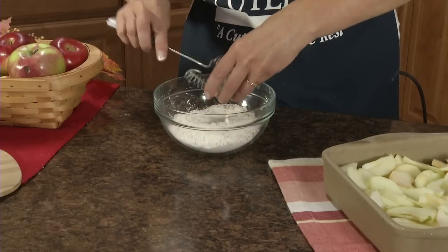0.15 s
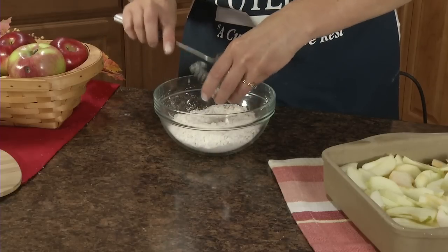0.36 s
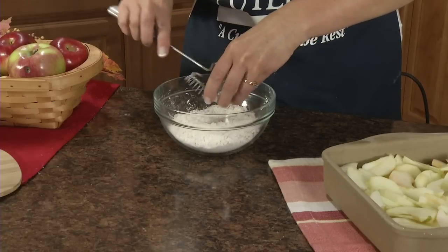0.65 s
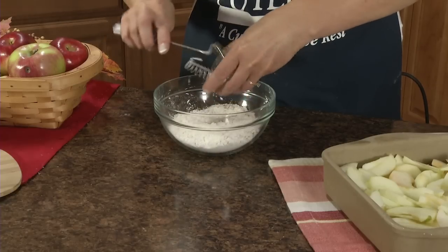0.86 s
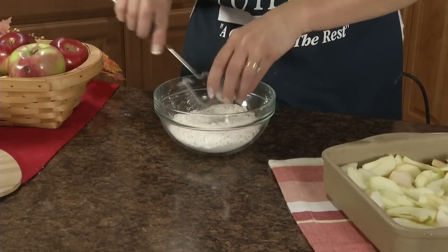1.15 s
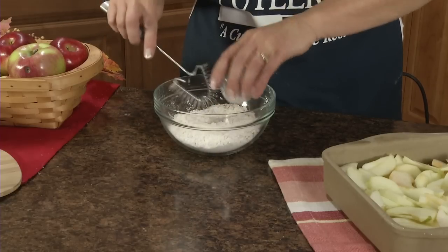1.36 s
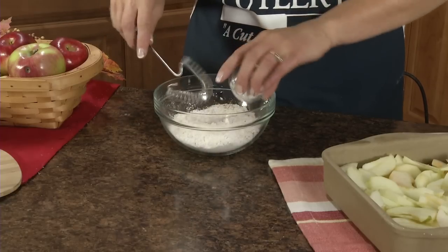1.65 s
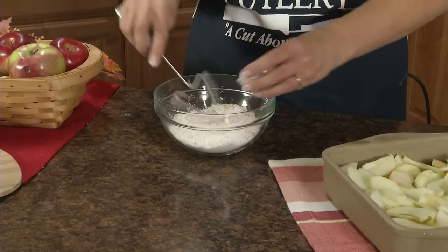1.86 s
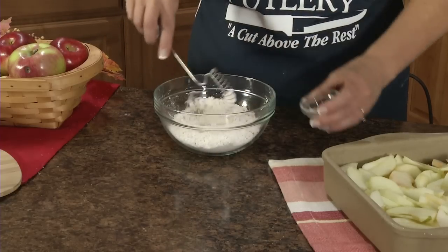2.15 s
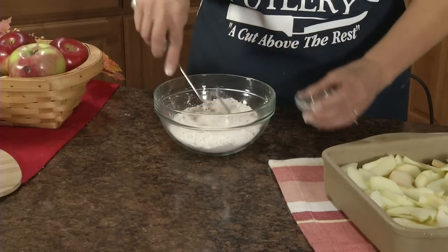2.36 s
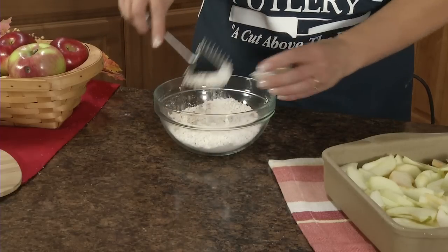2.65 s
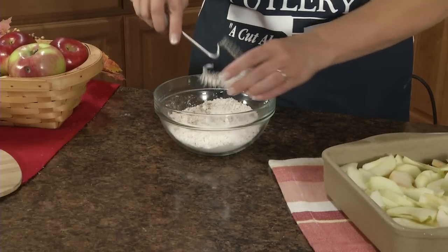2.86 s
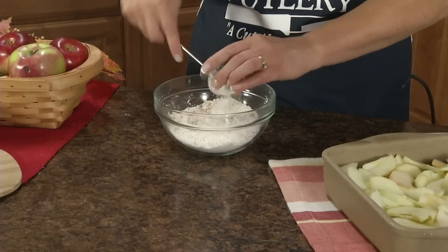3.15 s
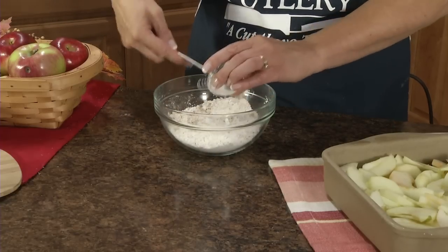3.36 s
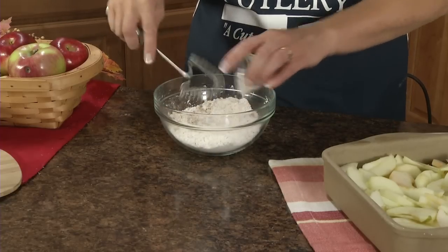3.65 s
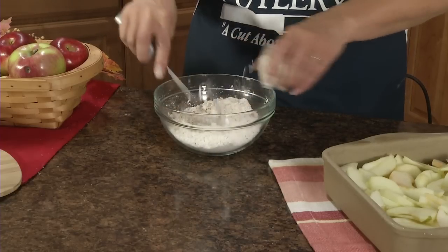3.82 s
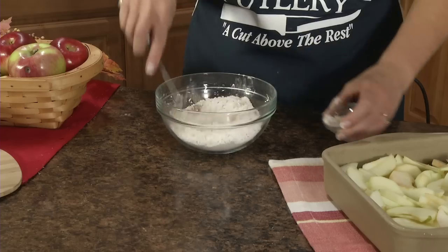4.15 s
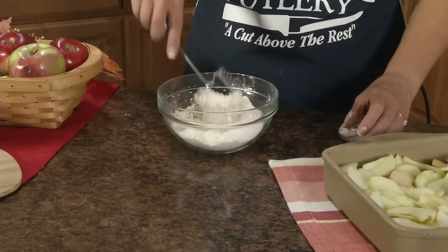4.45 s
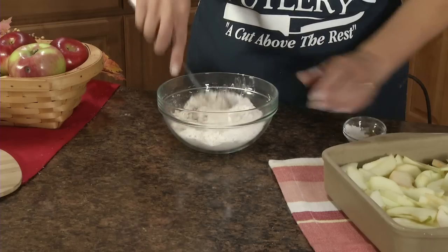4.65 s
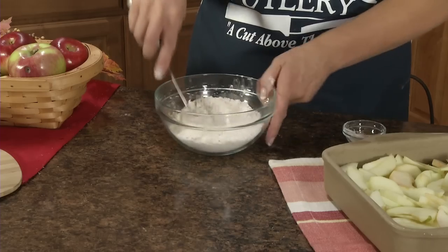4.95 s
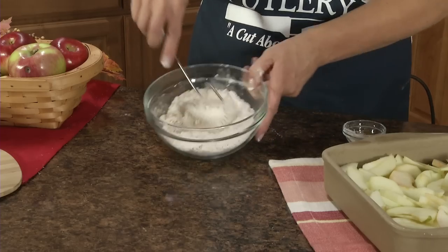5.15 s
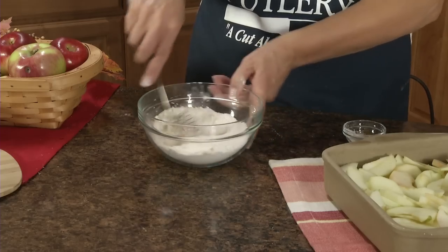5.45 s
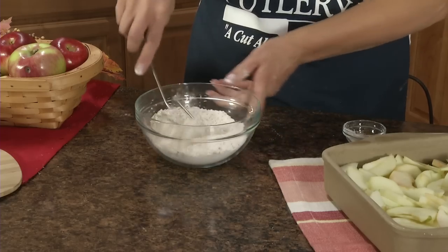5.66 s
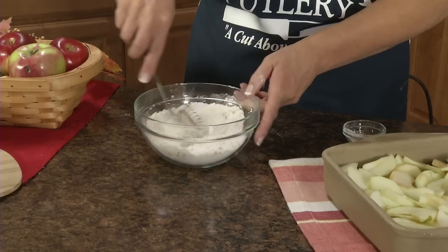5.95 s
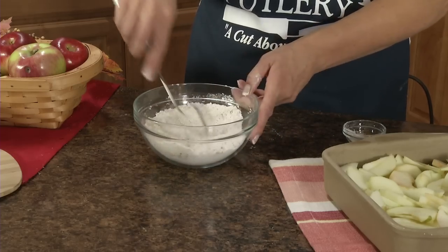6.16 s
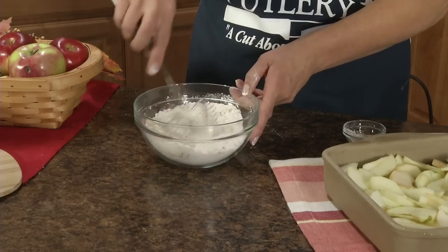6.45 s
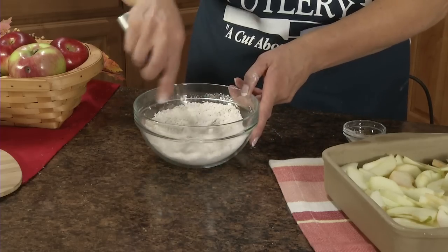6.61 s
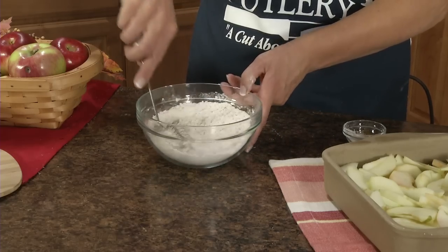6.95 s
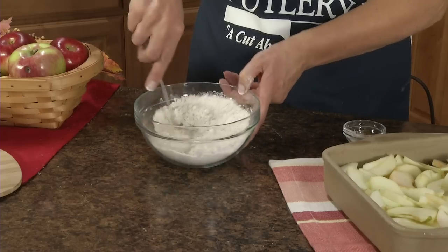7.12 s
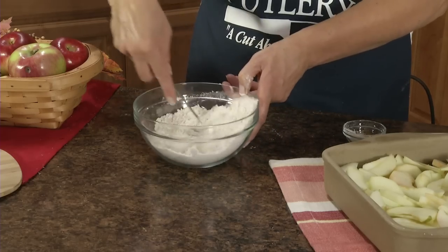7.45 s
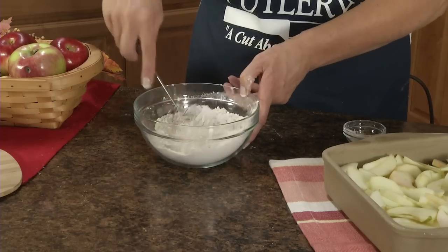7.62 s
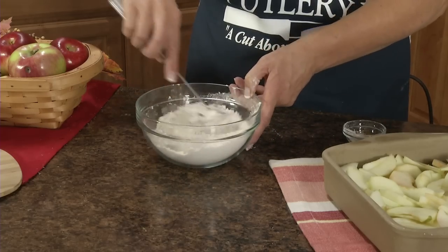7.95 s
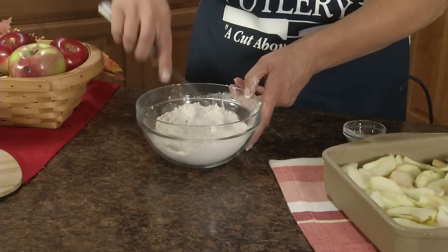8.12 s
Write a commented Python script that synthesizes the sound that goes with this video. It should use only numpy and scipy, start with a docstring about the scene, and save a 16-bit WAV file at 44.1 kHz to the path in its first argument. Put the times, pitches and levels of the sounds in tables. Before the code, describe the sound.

A small glass dish taps against whisk wires, knocks onto a stone counter, then a whisk swishes flour in a glass bowl that thuds twice.

```python
"""A whisk swishes softly through flour in a glass bowl on a stone counter, and pings the bowl's ringing wall.
A small glass dish is tapped against the whisk's wires, then knocks and bounces on the stone in damped modes.
The heavy bowl drags in short rubs and rocks onto the counter, twice strongly and once faintly.
The place is a small kitchen, heard through one channel: direct contacts, dense early echo, rumble, hiss and hum.
"""
import sys
import numpy as np
from scipy import signal
from scipy.fft import rfft, irfft
from scipy.io import wavfile
from scipy.ndimage import uniform_filter1d

SR = 44100
rng = np.random.default_rng(int(sys.argv[2]) if len(sys.argv) > 2 else 0)


def put_to_file(sound):
    """Save the sound as 16-bit audio at rate SR, in the file named by the first command-line argument."""
    columns = np.atleast_2d(sound).T  # one column per channel
    safe = np.clip(columns, -1, 1)
    whole_steps = np.round(safe * 32767)
    wavfile.write(sys.argv[1], SR, whole_steps.astype(np.int16))


N = 365148   # length in samples

# All spectra below are relative densities: level_db is per Hz.
# loudness curve of the whisk's swish through flour: time_s, level_db
SWISH_LOUDNESS = [(0, -58.5), (1.8, -60.5), (2.25, -52.5), (2.5, -61.5), (2.9, -56.5), (3.9, -59),
                  (4.3, -54.5), (5.1, -52.5), (5.7, -56.5), (6.2, -57.5), (6.5, -51.5), (6.8, -54.5),
                  (7.8, -56), (8.28, -56)]
# colour of the flour swish: pitch_hz, level_db
FLOUR_SPECTRUM = [(120, -24), (250, 3), (450, 6), (800, -4), (1500, -12), (4000, -13), (9000, -27),
                  (16000, -36)]
# the whisk pings the bowl's wall: start_s, level_db, contact_brightness_hz
WALL_PINGS = [(4.238, -54, 9000), (4.30, -55, 11800), (5.3644, -39.5, 15000), (6.5537, -37.5, 8800),
              (6.9409, -42, 7540), (7.865, -59, 6500), (7.896, -54, 7000)]
# ring of the glass wall: pitch_hz, level_db, t60_s
GLASS_MODES = [(1680, -9, 0.085), (3063, 1, 0.12), (4704, 1, 0.04), (6590, -7, 0.052), (8560, -8, 0.056),
               (9830, -6, 0.054), (10850, -2, 0.061), (13330, -6, .05)]
# crack of wire on glass: pitch_hz, level_db
WIRE_GRIT = [(400, -13), (1500, -2), (5000, -12), (10000, -2), (15000, -6)]

# the dish taps the wires: start_s, level_db, graze_s,
# scratch_db (dry scratch against the ring), second_touch_db (against the first)
DISH_TAPS = [(0.033, -39, 0.0055, -16, -13), (0.107, -24, 0.0056, -15.5, -33),
             (0.1886, -28.5, 0.0059, -4.5, -13), (0.314, -48.5, 0.004, -5, 2.5),
             (0.577, -39, 0.0048, 6, -10), (0.675, -37.5, .0053, 2, -14), (0.778, -36.5, 0.0078, 0, -4),
             (0.853, -51, 0.015, -5, -5.5), (1.028, -51, 0.0069, 14, -6), (1.141, -36, 0.0073, -4.5, -9),
             (1.155, -39.5, 0.013, 2, -16), (2.899, -49, 0.0023, 3, -20), (3.059, -33.5, 0.0043, -7, -33),
             (3.45, -48, 0.0043, 11, -18), (3.4965, -44.5, 0.0051, -1, -18)]
# ring of the wires: pitch_hz, level_db, t60_s
WIRE_MODES = [(3950, -18.5, 0.016), (4440, -20.5, 0.029), (5330, -7, 0.008), (7900, -21, 0.014),
              (9670, 2.5, 0.016), (9840, -5, 0.016), (10600, -36, .006)]
# dry scratch of glass on wire: pitch_hz, level_db
SCRATCH_SPECTRUM = [(300, -22), (1500, -10), (2900, -17.5), (3800, 10), (5500, -3), (6100, -2), (7000, -1),
                    (10800, -5.5), (11800, -30), (15500, -24)]
SWING_BACK_S = 0.028   # the springy wires meet the dish again this long after a tap
# the dish rests on the wires and brushes them at random: start_s, end_s
RESTS = [(0.03, 1.2), (3.071, 3.36)]
BRUSHES_PER_S, BRUSH_S = 14, 0.032
BRUSH_DB, BRUSH_SPREAD_DB, BRUSH_SCRATCH_DB = -68, 0.5, -9

# the dish knocks on the counter: start_s, level_db, contact_brightness_hz,
# first_bounce_s (after the knock), first_bounce_loss_db (below the knock)
DISH_KNOCKS = [(4.4042, -17.5, 1380, 0.0084, 7.5), (4.598, -25, 710, .008, 16),
               (4.6015, -20.5, 2410, .019, 9), (4.694, -24, 1200, .005, 15), (4.775, -14, 4100, .0178, 6.5),
               (4.879, -26, 1900, .019, 4.5)]
# ring of the dish on stone: pitch_hz, level_db, t60_s
DISH_MODES = [(110.5, -16, 0.097), (235, -18.5, 0.042), (384, -10.5, 0.046), (492, -6, 0.063),
              (622, 0.5, 0.037), (757, -4.5, 0.064), (882, -12.5, 0.17), (1050, -19, 0.062),
              (1136, -6, 0.024), (1220, -11, 0.035), (1400, -6.5, 0.043), (1590, -4.5, 0.032),
              (1645, -7, 0.021), (1945, -2, 0.018), (2334, -1.5, 0.025), (2474, 0, 0.028),
              (2770, -1, 0.025), (3080, -2, 0.013), (3520, -23, .008), (4200, -1.5, 0.016),
              (4870, -10, 0.0098), (6450, -11, 0.009)]
# crack of glass on stone: pitch_hz, level_db
STONE_GRIT = [(100, -3.5), (300, -15), (600, 0.5), (1400, 2), (2800, 0), (4500, -3.5), (7000, -10.5),
              (15000, -23)]
# the dish rocks from edge to edge: each bounce is later, weaker and duller
BOUNCES = 3
BOUNCE_GAP_GROWTH, BOUNCE_DULLING, BOUNCE_LOSS_POWER = 1.35, 0.78, 0.8   # ratio, ratio, exponent

# the bowl rocks onto the counter: start_s, level_db, contact_brightness_hz
BOWL_THUDS = [(5.406, -7, 1460), (7.5435, -12, 1220), (7.865, -41, 2800)]
# heavy, damped ring of the full bowl: pitch_hz, level_db, t60_s
THUD_MODES = [(360, -2, 0.052), (414, 10.5, 0.022), (614, -0.5, 0.054), (850, -11.5, 0.048),
              (1210, -5.5, .018), (1700, -4, 0.01), (2570, 3.5, 0.0035), (4350, -5, 0.011)]
# the bowl's foot drags on the stone: start_s, end_s, level_db
FOOT_DRAGS = [(5.214, 5.394, -38.5), (7.494, 7.525, -42.5)]
# dull rub of the foot: pitch_hz, level_db
DRAG_SPECTRUM = [(150, -13), (290, -6), (480, 0), (650, -19), (1000, -25), (1500, -23.5), (2500, -39),
                 (8000, -50)]
SLIP_GAP_S, SLIP_S, DRAG_SWELL_DB = 0.033, 0.037, 8.5   # slips swell and ease off
# tiny dry ticks: start_s, level_db
DRY_TICKS = [(2.367, -52), (2.9688, -43), (5.6177, -50), (6.594, -42)]

# low rumble: pitch_hz, level_db
RUMBLE_SPECTRUM = [(4, -36), (12, 4.5), (19, 5.5), (25, 15.5), (36, 0.5), (52, -6.5), (62, -25), (80, -22),
                   (120, -51)]
# still air of the room: pitch_hz, level_db
ROOM_SPECTRUM = [(60, 5), (110, 6.5), (160, 1), (220, 2.5), (350, -5), (450, -2), (700, -9.5), (1300, -14),
                 (2800, -18), (3900, -15), (5200, -22), (10000, -33.5), (12500, -52), (16000, -68)]
RUMBLE_DB, ROOM_TONE_DB = -38, -49
# a running machine, mains hum and a faint whine: pitch_hz, width_hz, level_db
HUM_LINES = [(16.47, 0.076, -36), (28.9, 0.031, -43), (59.3, 0.67, -48.5), (120, 0.26, -56.5),
             (208, 2.09, -64.5), (1680, 6.7, -87), (1754, 4, -70.5), (1890, 25.4, -68.5)]
# colour of the kitchen's echo: pitch_hz, level_db
ECHO_SPECTRUM = [(100, -8), (350, -22), (650, -10), (1400, -2), (3000, -6.5), (5000, -5), (10000, -10),
                 (16000, -18)]
# decay of the kitchen's echo: pitch_hz, t60_s
ECHO_DECAY = [(100, 0.092), (1200, .27), (4000, 0.3), (10000, 0.22), (16000, 0.19)]

CUTOFF_HZ = 15650
RING_SIZE = 8192      # samples in one contact sound
LEVEL_WINDOW = 176    # samples, about 4 ms


def flour(grain_db):
    """Wires plough through powder: countless soft grains of uneven strength on a moving loudness curve."""
    grains = rng.standard_normal(N) * from_db(grain_db * rng.standard_normal(N))
    swish_db = np.interp(np.arange(N) / SR, *np.transpose(SWISH_LOUDNESS))
    return from_db(swish_db) * coloured(grains, FLOUR_SPECTRUM)


def wall_pings():
    """Wire strikes set the bowl's glass wall ringing, with a brief crack at contact."""
    return strikes(WALL_PINGS, GLASS_MODES, WIRE_GRIT, grit_db=-1.5, grit_s=0.0017)


def taps():
    """Each dish tap is followed by a second touch as the wires swing back."""
    out = np.zeros(N)
    for start_s, level_db, graze_s, scratch_db, second_db in DISH_TAPS:
        add(out, start_s, level_db, touch(graze_s, scratch_db))
        add(out, start_s + SWING_BACK_S, level_db + second_db, touch(graze_s, scratch_db))
    return out


def brushes():
    """While the dish rests on the whisk, faint touches keep the wires shimmering."""
    out = np.zeros(N)
    for rest_start_s, rest_end_s in RESTS:
        for slot_s in np.arange(rest_start_s, rest_end_s, 1 / BRUSHES_PER_S):
            start_s = slot_s + rng.random() / BRUSHES_PER_S
            level_db = BRUSH_DB + BRUSH_SPREAD_DB * rng.standard_normal()
            add(out, start_s, level_db, touch(BRUSH_S, BRUSH_SCRATCH_DB))
    return out


def touch(graze_s, scratch_db):
    """Glass grazes wire: a dry scratch, and the wires' ring."""
    slips = graze(graze_s)
    wire_ring = rms_one(ring(slips, WIRE_MODES))
    return wire_ring + from_db(scratch_db) * coloured(slips, SCRATCH_SPECTRUM)


def dish_knocks():
    """The dish hits and bounces on stone: damped glass modes and a gritty crack."""
    return strikes(bounces(), DISH_MODES, STONE_GRIT, grit_db=-1, grit_s=0.0053)


def bounces():
    """List every knock and its bounces, with widening gaps and falling level and brightness."""
    k = np.arange(BOUNCES + 1)
    gaps_gone = np.r_[0, np.cumsum(BOUNCE_GAP_GROWTH ** k[:-1])]
    events = []
    for start_s, level_db, bright_hz, gap_s, loss_db in DISH_KNOCKS:
        for i in k:
            bounce_s = start_s + gap_s * gaps_gone[i]
            bounce_db = level_db - loss_db * i ** BOUNCE_LOSS_POWER
            events.append((bounce_s, bounce_db, bright_hz * BOUNCE_DULLING ** i))
    return events


def thuds(low_cut_hz):
    """The bowl always lands on its foot, and is too small to radiate deep bass."""
    out = np.zeros(N)
    low_cut = signal.butter(2, low_cut_hz, "high", fs=SR)
    for start_s, level_db, bright_hz in BOWL_THUDS:
        force = signal.lfilter(*low_cut, blow(bright_hz))
        add(out, start_s, level_db, -ring(force, THUD_MODES))
    return out


def drags():
    """The bowl shifts in runs of short, dull rubs, strongest in the middle."""
    out = np.zeros(N)
    for drag_start_s, drag_end_s, level_db in FOOT_DRAGS:
        for slip_s in np.arange(drag_start_s + SLIP_GAP_S / 2, drag_end_s, SLIP_GAP_S):
            push = np.sin(np.pi * (slip_s - drag_start_s) / (drag_end_s - drag_start_s))
            slip_db = level_db - DRAG_SWELL_DB * (1 - push)
            add(out, slip_s, slip_db, coloured(graze(SLIP_S), DRAG_SPECTRUM))
    return out


def ticks():
    """Bare, bright clicks with no ring: impulses with their lows filtered away."""
    out = np.zeros(N)
    click = signal.lfilter(*signal.butter(1, 3500, "high", fs=SR), signal.unit_impulse(512))
    for start_s, level_db in DRY_TICKS:
        add(out, start_s, level_db, click)
    return out


def kitchen(x, first_echo_s):
    """Dense reflections from cupboards and walls, dying band by band."""
    t = np.arange(SR // 2) / SR
    white = rng.standard_normal((2, len(t)))
    tail = np.zeros(len(t))
    edges = np.geomspace(90, 17000, 16)
    for k, (low_hz, high_hz) in enumerate(zip(edges, edges[1:])):
        band_filter = signal.butter(2, [low_hz, high_hz], "band", fs=SR, output="sos")
        band = signal.sosfilt(band_filter, white[k % 2])   # neighbouring bands use separate noises
        t60_s = at_hz(ECHO_DECAY, np.sqrt(low_hz * high_hz))
        tail += band * np.exp(-np.log(1000) * t / t60_s)
    # silent until the first echo, at full strength by twice that time
    build_up = np.clip(t / first_echo_s - 1, 0, 1)
    # the field is diffuse, so no narrow band stands out of the room's colour
    spectrum = rfft(tail * build_up, SR)
    spectrum /= np.sqrt(uniform_filter1d(np.abs(spectrum) ** 2, size=50) + 1e-12)
    colour = from_db(at_hz(ECHO_SPECTRUM, np.arange(len(spectrum))))   # bins are 1 Hz apart
    response = irfft(spectrum * colour, SR)[:len(t)]
    return signal.fftconvolve(x, response * build_up)[:N]


def background():
    """Low rumble, an even hiss, and hum lines broadened by randomly wandering phase."""
    out = from_db(RUMBLE_DB) * coloured(rng.standard_normal(N), RUMBLE_SPECTRUM)
    out += from_db(ROOM_TONE_DB) * coloured(rng.standard_normal(N), ROOM_SPECTRUM)
    for pitch_hz, width_hz, level_db in HUM_LINES:
        wander = np.sqrt(2 * np.pi * width_hz / SR) * rng.standard_normal(N)
        phase = np.cumsum(2 * np.pi * pitch_hz / SR + wander)
        out += from_db(level_db) * np.sqrt(2) * np.sin(phase)
    return out


def strikes(events, modes, grit, grit_db, grit_s):
    """Blows at changing spots on one body: its ring, and a gritty crack while surfaces settle."""
    out = np.zeros(N)
    for start_s, level_db, bright_hz in events:
        force = blow(bright_hz)
        rough_force = signal.fftconvolve(graze(grit_s), force)[:RING_SIZE]
        crack = level_one(coloured(rough_force, grit))
        body = level_one(ring(force, modes, contact_spot(modes)))
        add(out, start_s, level_db, body + from_db(grit_db) * crack)
    return out


def contact_spot(modes):
    """Neighbouring modes swing against each other; each spot meets them with its own strengths."""
    signs = np.resize([1, -1], (len(modes), 1))
    return signs * from_db(rng.standard_normal((len(modes), 1)))


def ring(force, modes, weights=1):
    """A force sets damped modes ringing; weights say how well the contact reaches each."""
    t = np.arange(RING_SIZE) / SR
    pitch_hz, level_db, t60_s = np.array(modes).T[:, :, None]
    decay = from_db(level_db - 60 * t / t60_s)
    response = np.sum(weights * decay * np.cos(2 * np.pi * pitch_hz * t), axis=0)
    return signal.fftconvolve(force, response)[:RING_SIZE]


def blow(bright_hz):
    """One short push; the softer the contact, the duller."""
    softness = signal.butter(2, min(bright_hz, 0.45 * SR), fs=SR)
    return signal.lfilter(*softness, signal.unit_impulse(512))


def graze(length_s):
    """A quick run of tiny random slips that swells and dies."""
    age = np.arange(RING_SIZE) / SR / (length_s / 2)
    return rng.standard_normal(RING_SIZE) * np.sqrt(age) * np.exp(-age)


def add(track, start_s, level_db, sound):
    """Place a sound at a time, with the given level at its loudest; its far end fades to nothing."""
    start = int(start_s * SR)
    fade = np.minimum(np.linspace(2, 0, len(sound)), 1) ** 2
    part = level_one(sound * fade)[:N - start]
    track[start:start + len(part)] += from_db(level_db) * part


def level_one(sound):
    """Scale a sound so that its loudest 4 ms have an rms of 1."""
    return sound / np.sqrt(uniform_filter1d(sound ** 2, size=LEVEL_WINDOW).max())


def rms_one(x):
    """Scale to an rms of 1."""
    return x / np.sqrt(np.mean(x ** 2) + 1e-20)


def coloured(x, spectrum):
    """Give noise a spectrum and an rms of 1."""
    gain = from_db(at_hz(spectrum, np.fft.rfftfreq(len(x), 1 / SR)))
    return rms_one(np.fft.irfft(rfft(x) * gain, len(x)))


def at_hz(points, hz):
    """Read a table along a log-frequency axis."""
    table = np.array(points)
    return np.interp(np.log(np.maximum(hz, 1)), np.log(table[:, 0]), table[:, 1])


def from_db(db):
    """Decibels to gain."""
    return 10 ** (np.asarray(db) / 20)


def gain_control(x, threshold_db, slope, release_db_per_s):
    """Loud blows turn the gain down by slope dB per dB over threshold, and it creeps back."""
    level_db = 10 * np.log10(np.abs(uniform_filter1d(x[0] ** 2, size=LEVEL_WINDOW)) + 1e-12)
    recovery_db = release_db_per_s * np.arange(N) / SR
    wanted_cut_db = slope * np.maximum(level_db - threshold_db, 0)
    # the deepest cut holds, less what has been recovered since
    cut_db = np.maximum.accumulate(wanted_cut_db + recovery_db) - recovery_db
    return x * from_db(-cut_db)


def scene():
    """All contacts but the dry ticks echo in the same small kitchen, over flour and background."""
    swish = flour(grain_db=6)
    pings = wall_pings()
    whisk = taps() + brushes()
    dish = dish_knocks()
    bowl = thuds(low_cut_hz=176) + drags()
    # how strongly each source feeds the room
    to_room = from_db(-1.5) * whisk + from_db(1.55) * dish + bowl + from_db(2.5) * pings
    echo = kitchen(to_room, first_echo_s=0.0027)
    return (whisk + dish + bowl + pings + echo + ticks() + swish + background())[None]


def record(dry):
    """One microphone channel: gain control, then the top is cut steeply."""
    levelled = gain_control(dry, threshold_db=-21.5, slope=0.2, release_db_per_s=0.44)
    top_cut = signal.ellip(10, 0.1, 80, CUTOFF_HZ, fs=SR, output="sos")
    return signal.sosfilt(top_cut, levelled)


dry = scene()
out = record(dry)
put_to_file(out)
```